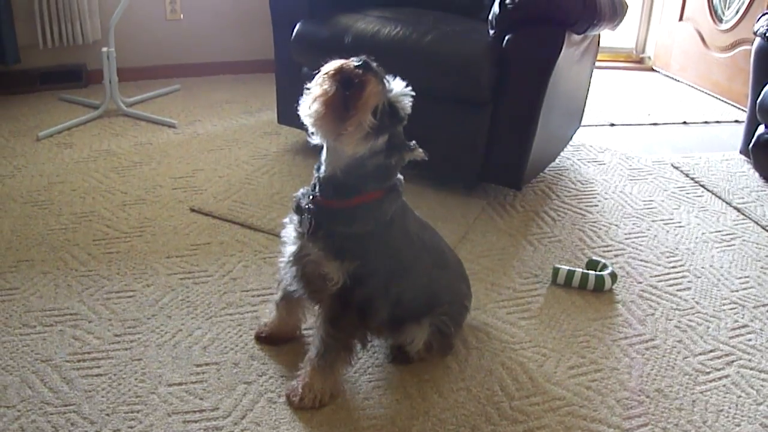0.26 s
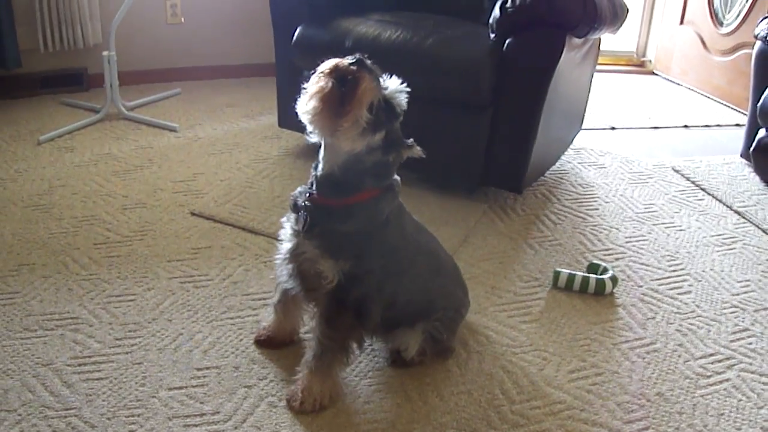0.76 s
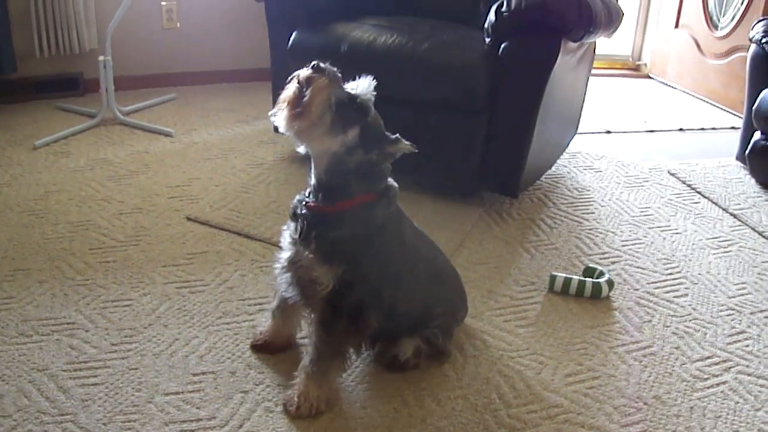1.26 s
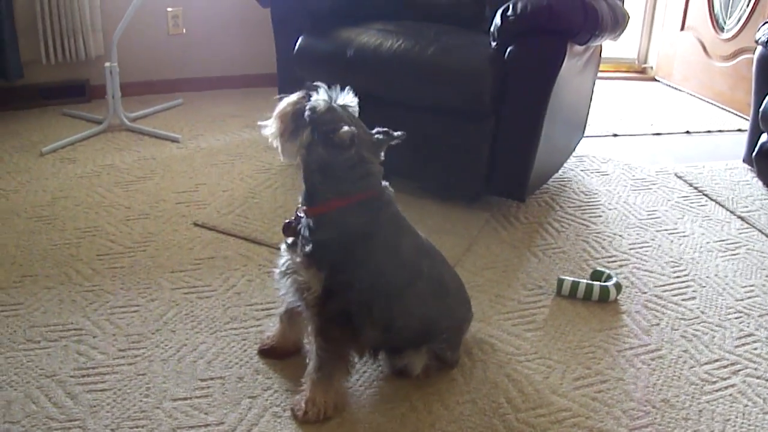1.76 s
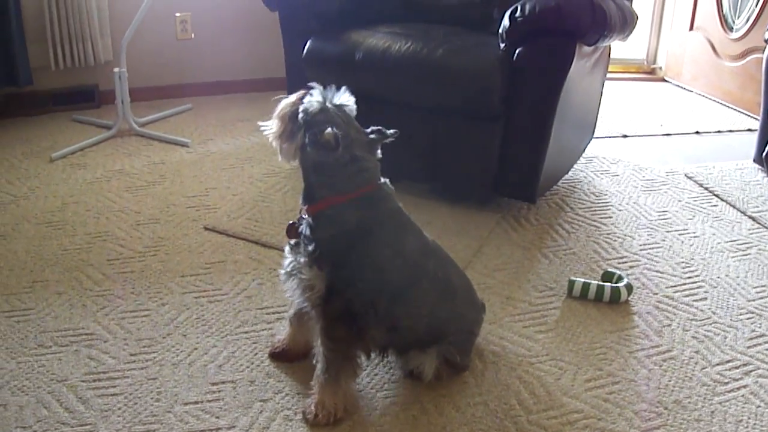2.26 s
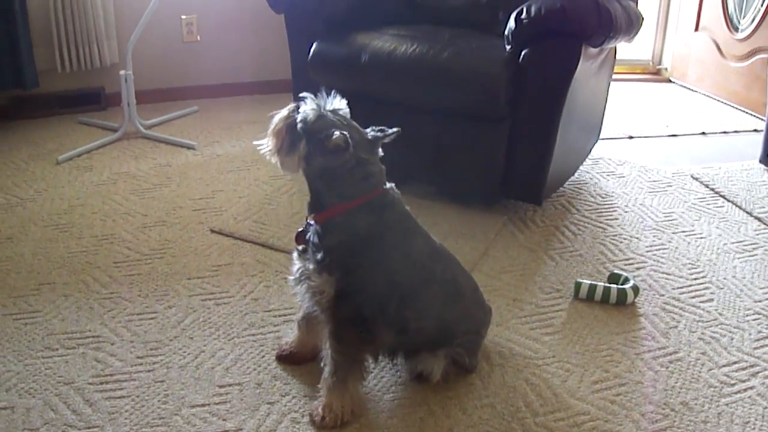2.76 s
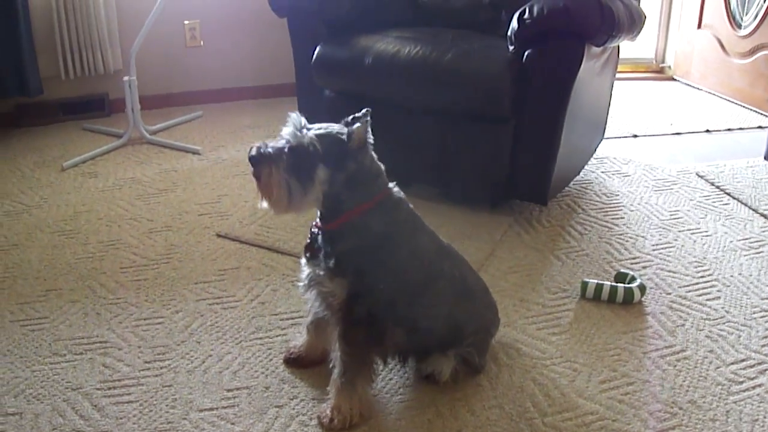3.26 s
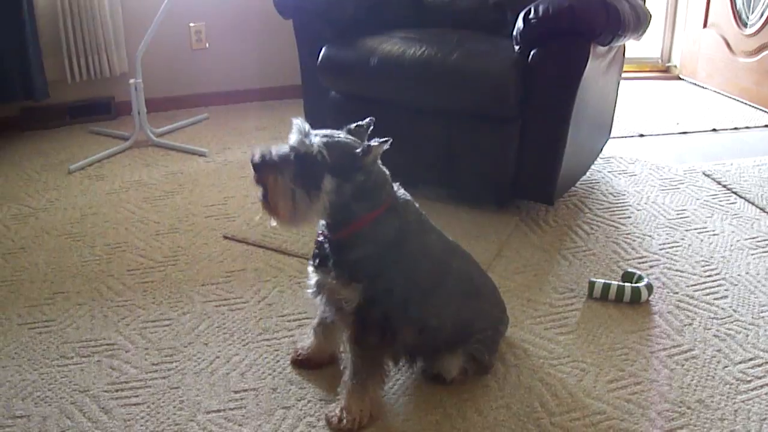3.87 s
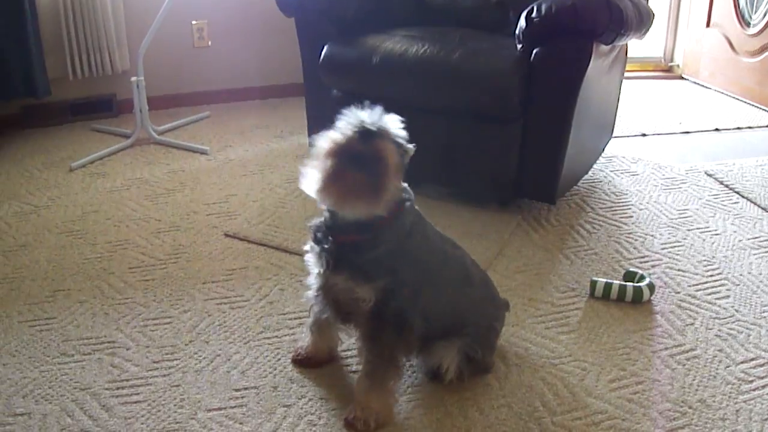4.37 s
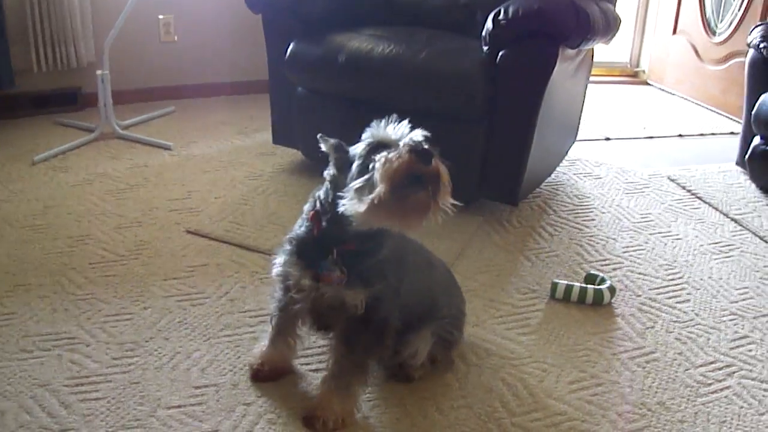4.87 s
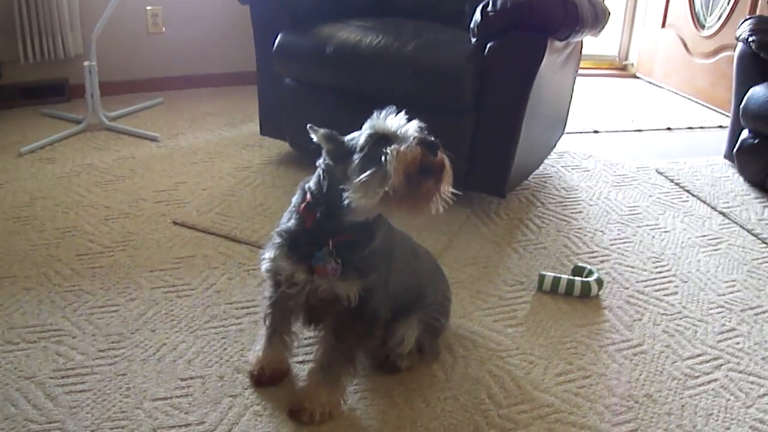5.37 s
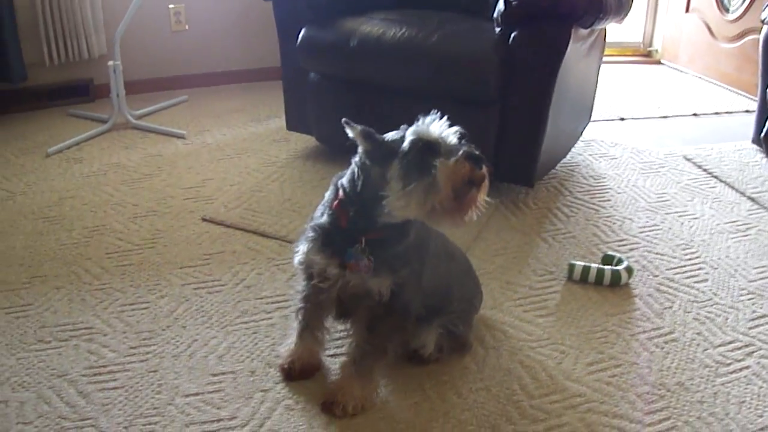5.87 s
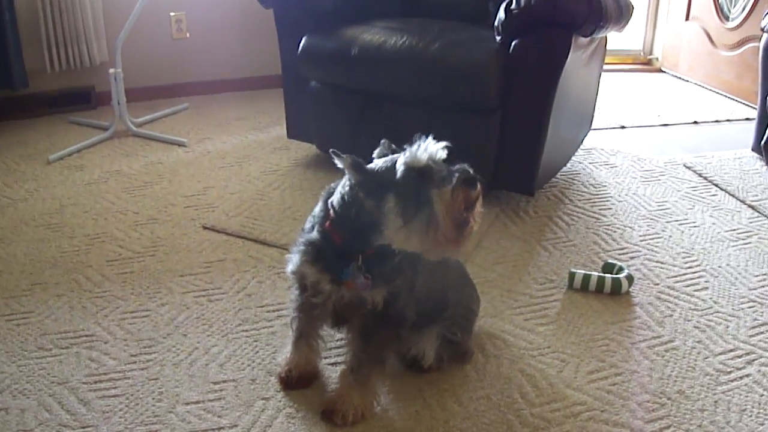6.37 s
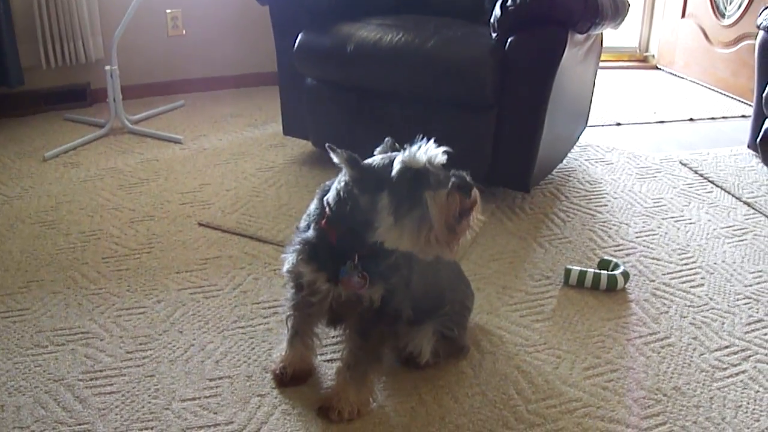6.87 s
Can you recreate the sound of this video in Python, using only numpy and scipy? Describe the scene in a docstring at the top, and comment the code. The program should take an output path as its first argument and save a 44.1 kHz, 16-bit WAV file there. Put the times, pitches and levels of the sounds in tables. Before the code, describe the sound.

A small dog howls in sliding notes and short hoarse yowls while a second dog whines thinly farther off in a quiet room.

```python
"""Two dogs howling and whining

A small dog on a living-room carpet howls: long sliding notes, and short yowls that turn hoarse when
its vocal folds swing unevenly. A second dog farther off whines in a thin voice that flips between a
low and a high register. A little shuffling, soft bumps and the furnished room's short ring surround them."""
import sys
import numpy as np
from scipy import signal
from scipy.fft import rfft, irfft, next_fast_len
from scipy.io import wavfile
from scipy.ndimage import uniform_filter1d, minimum_filter1d

SR = 44100
rng = np.random.default_rng(int(sys.argv[2]) if len(sys.argv) > 2 else 0)


def generate_wav(sig):
    """Save sig (samples, or channels by samples) to the path in sys.argv[1] as 16-bit PCM at SR."""
    pcm = np.round(np.clip(np.atleast_2d(sig).T, -1, 1) * 32767).astype(np.int16)
    wavfile.write(sys.argv[1], SR, pcm)


N = 313992
BREAK_HZ = 1297   # where the whine's low register ends
CUTOFF_HZ = 11050   # the treble stops here


def howls():
    """Three long sliding notes, pressed harder and so brighter when they leave the dog's easy pitch."""
    # the course of each howl: time_s, pitch_hz, fundamental_db, octave_db
    first_howl = [(0.0, 562.5, -10.5, -8), (0.072, 557.6, -16, -25), (0.14, 502, -28.5, -17.5),
                  (0.2, 485.8, -22.5, -34.5), (0.264, 497.8, -26.5, -18.5), (0.35, 566, -15.5, -13.5),
                  (0.492, 580.9, -21, -12.5), (0.512, 578.0, -20, -23.5), (0.62, 557, -17.5, -17.5),
                  (0.716, 597, -17, -11), (0.992, 585.9, -20.5, -18), (1.018, 548, -15, -36),
                  (1.042, 530, -30.5, -28), (1.06, 510, -38, -45)]
    long_howl = [(4.05, 582, -19.5, -12), (4.15, 671.5, -15, -14), (4.362, 641.4, -14.5, -21.5),
                 (4.412, 652.8, -17.5, -11), (4.72, 621, -13.5, -27), (4.756, 623.8, -19, -13),
                 (4.854, 613.2, -17, -24), (4.94, 602.5, -12.5, -14), (4.978, 599.5, -11, -28.5),
                 (5.176, 589.2, -14, -20), (5.354, 597.2, -11, -21), (5.418, 586.3, -18.5, -32),
                 (5.562, 576.3, -27, -24.5), (5.602, 550.2, -16, -18.5), (5.7, 465.3, -46.5, -24.5)]
    last_howl = [(6.67, 533.4, -33.5, -31), (6.714, 547, -17.5, -15), (6.764, 624, -15, -27.5),
                 (6.826, 625.8, -14, -19), (6.952, 585.4, -16, -31), (7.09, 565.3, -29.5, -23),
                 (7.12, 575, -15.5, -18)]
    # overtones from pressing the voice: pitch_hz, pressed_db
    strain = [(430, -47.5), (500, -59), (560, -55), (595, -62.5), (630, -59), (665, -50.5)]
    out = np.zeros(N)
    for course in (first_howl, long_howl, last_howl):
        at, gate = span(course[0][0], course[-1][0])
        pitch, fundamental_db, octave_db = in_time(course, at / SR)
        out += voice(at, gate, pitch, fundamental_db, octave_db, at_hz(strain, pitch), hoarseness(at))
    return out


def yowls(attack_s=.02, release_s=.011, sag_db_per_s=15.5):
    """Each yowl is one push: the pitch swoops up through the throat's resonance, then mostly sinks."""
    # arches of pitch: start_s, rise_s, fall_s, start_hz, top_hz, end_hz,
    # fall_shape (under 1 drops early), level_db, pressed_db, fade_db (over the fall)
    arches = [ (1.36, 0.034, 0.13, 770, 797, 715, 1.7, -27.5, -54.5, -1),
              (1.528, 0.087, .235, 542.2, 719.4, 548.4, 1.1, -11.5, -51, 11.5),
              (1.834, 0.11, 0.25, 535, 744, 514.8, 0.9, -14, -45, 2),
              (2.194, 0.074, 0.24, 532.4, 654.4, 430, 1.2, -10.5, -56.5, 11),
              (2.512, 0.14, 0.01, 300.1, 345, 347, 1.0, -26.5, -53.5, -3.5),
              (2.636, 0.037, .275, 429, 625.7, 480.4, .72, -14.5, -37.5, 6.5),
              (2.945, .08, .31, 487, 718, 324, 0.79, -14, -36.5, 22.5),
              (3.895, 0.12, .055, 473.7, 612, 568, 0.74, -15.5, -41.5, 2),
              (6.133, 0.069, .17, 561.4, 738.7, 503, 1.1, -13.5, -52, 6.5),
              (6.36, .115, 0.21, 486.2, 793.7, 532.7, 0.89, -14, -42, 14), ]
    # how the throat shapes the two lowest harmonics: frequency_hz, gain_db
    throat = [(320, -13), (430, -16), (510, -14.5), (570, -13), (640, -2.5), (740, 0.5), (880, -10),
              (1050, -8.5), (1270, -6.5), (1500, -12.5)]
    out = np.zeros(N)
    for start_s, rise_s, fall_s, start_hz, top_hz, end_hz, shape, level_db, pressed_db, fade_db in arches:
        at, gate = span(start_s, start_s + rise_s + fall_s + release_s)
        age = (at - at[0]) / SR
        past_top = np.maximum(age - rise_s, 0)
        risen = np.sin(np.pi / 2 * np.minimum(age / rise_s, 1)) ** 1.1
        fallen = np.sin(np.pi / 2 * np.minimum(past_top / fall_s, 1) ** shape) ** 2
        pitch = start_hz + (top_hz - start_hz) * risen + (end_hz - top_hz) * fallen
        envelope = np.minimum(age / attack_s, 1) * np.minimum((age[-1] - age) / release_s, 1)
        slack_db = fade_db * (past_top / fall_s) ** 1.15
        hoarse = hoarseness(at)
        # at the foot of the rise the push is harder and the voice not yet pressed
        push_db = level_db - slack_db + 5 * (1 - risen)
        press_db = pressed_db - slack_db - 3 * (1 - risen) - sag_db_per_s * past_top + 7 * hoarse
        fundamental_db = push_db + at_hz(throat, pitch)
        octave_db = push_db + at_hz(throat, 2 * pitch)
        rough = hoarse + .12 * fallen
        out += voice(at, gate * envelope, pitch, fundamental_db, octave_db, press_db, rough)
    return out


def voice(at, gate, pitch, fundamental_db, octave_db, pressed_db, rough,
          waver=.025, jitter=.029, blur_hz=1400, easy_db=-57, rasp_db=22.5):
    """Vocal folds swing almost as a pure tone; when hoarse, each cycle differs in length and strength."""
    # how the open mouth shapes pressed overtones and rasp: frequency_hz, gain_db
    mouth = [(500, -2.5), (900, -7.5), (1300, 21.5), (1700, 7.5), (2050, 10), (2350, -4.5), (3050, 2),
             (3450, -6), (3850, -25.5), (4900, -16.5), (6000, -27.5), (7800, -17.5), (11000, -35)]
    # a thin, bright edge on the voice: frequency_hz, gain_db
    edge_colour = [(2000, -74.5), (3500, -72), (4400, -55), (5200, -59), (6100, -73), (7000, -61),
                   (7600, -61), (8200, -67), (8900, -54.5), (9500, -66), (10100, -61.5), (11000, -63.5)]
    size = len(at)
    phase = phase_of(pitch * (1 + rough * (waver * wobble(32, size) + jitter * wobble(200, size))))
    fundamental, octave, pressed = from_db(fundamental_db), from_db(octave_db), from_db(pressed_db)
    # pressing adds at most 1 dB to the edge
    edge = np.hypot(fundamental, octave) * from_db(np.minimum(.86 * (pressed_db - easy_db), 1))
    overtones = octave * partial(phase, 2)
    for k in range(3, 20):
        hz = k * pitch
        # ragged closing of the folds loses the highest harmonics; each comes and goes on its own
        clear = from_db(6.5 * wobble(10.2, size)) / (1 + (rough * hz / blur_hz) ** 2)
        strength = pressed * from_db(at_hz(mouth, hz)) + edge * from_db(at_hz(edge_colour, hz))
        overtones += clear * strength * partial(phase, k)
    # uneven cycles shake the overtones far more than the fundamental
    tone = fundamental * partial(phase, .99) * (1 + .13 * rough * wobble(140, size))
    # in fits, strong and weak cycles alternate
    alternate = .56 * wobble(25, size) * np.sin(phase / 2)
    tone += overtones * (1 + rough * (.95 * wobble(290, size) + alternate))
    # air rasps through the folds once a cycle
    rasp = coloured_noise(mouth, size) * (1 + np.sin(phase) / 2)
    rasp = cut_bass(rasp, 600, order=4)
    out = np.zeros(N)
    out[at] = gate * (tone + from_db(rasp_db) * pressed * rough ** 1.5 * rasp)
    # the small throat sends out little below its lowest note
    return cut_bass(out, 200)


def hoarseness(at, clear_roughness=.059):
    """How rough the howler's voice is, from 0 to 1, at the given samples."""
    # hoarse moments: middle_s, half_length_s, roughness
    moments = [(1.562, 0.052, 0.79), (1.954, 0.058, 0.72), (2.642, 0.028, 0.37), (3.1, .12, .25),
               (3.983, .035, 0.45), (6.165, .027, 0.99), (6.465, .045, 0.74)]
    extra = sum(rough * np.exp(-((at / SR - s) / half) ** 2 / 2) for s, half, rough in moments)
    return np.clip(clear_roughness + extra, 0, 1)


def moan(waver=.0027):
    """A soft low note between howls, sinking slowly."""
    # the note's course: time_s, pitch_hz, level_db
    course = [(5.86, 346, -73), (5.949, 323, -46), (6.022, 321.2, -38.5), (6.1, 316, -39.5),
              (6.15, 321, -66)]
    # its harmonics: multiple, gain_db
    harmonics = [(1, -23), (2, 1.5), (3, 1.5), (4, -8.5)]
    at, gate = span(course[0][0], course[-1][0])
    pitch, level_db = in_time(course, at / SR)
    phase = phase_of(pitch * (1 + waver * wobble(35, len(at))))
    tone = sum(from_db(db) * partial(phase, round(k)) for k, db in harmonics)
    out = np.zeros(N)
    out[at] = gate * from_db(level_db) * tone
    return out


def whines(attack_s=.0027, jitter=.012, flip_jitter=.08, steady_rasp=.21):
    """Whistle-like, unsteady tones that crack into rasp when the pitch leaps to the other register."""
    # the second dog's calls: start_s, climb_s, upper_s, tail_s, start_hz, top_hz, end_hz,
    # climb_db, upper_db, tail_db
    calls = [ (0, 0.052, 0.15, 0.055, 1188, 1759, 1240, -22, -30, -34),
             (0.474, .037, 0.049, 0.057, 1036, 1946, 1220, -20.5, -31, -24),
             (.8, 0.044, 0.25, .09, 920, 1860, 1220, -26, -35, -25.5),
             (1.139, 0.026, 0.063, .14, 1215, 1794, 1433, -25, -26.5, -24.5),
             (1.334, 0.015, 0.25, 0.0099, 1300, 1898, 1300, -36, -42.5, -62),
             (1.66, 0.022, 0.081, .05, 1285, 1900, 1300, -51, -38, -52),
             (2.374, 0.026, 0.076, 0.065, 1004, 1747, 1250, -28, -29.5, -23),
             (3.407, 0.044, .16, .125, 1030, 1716, 885, -22.5, -34, -29),
             (3.714, 0.094, 0.045, 0.073, 883, 1785, 1150, -23.5, -32, -20),
             (4.557, 0.032, 0.15, 0.38, 987, 1853, 1400, -32.5, -42, -45.5),
             (4.885, 0.027, .16, .06, 1230, 1892, 1350, -33, -39.5, -57),
             (5.328, 0.096, 0.19, 0.1, 1041, 1910, 900, -37.5, -44, -38.5),
             (5.708, .045, 0.056, 0.13, 971, 1875, 1260, -29.5, -37, -31.5),
             (6.116, 0.043, 0.048, 0.13, 1034, 1809, 1230, -25.5, -35.5, -35.5),
             (6.668, 0.04, .12, 0.35, 1298, 1848, 1290, -28.5, -39.5, -35.5), ]
    # how its mouth shapes upper harmonics and rasp: frequency_hz, gain_db
    mouth = [(700, -21), (1200, -12), (1900, 1), (2600, 2), (3400, 0), (4000, -5), (5000, -2.5),
             (5900, -31), (8000, -24), (11000, -33)]
    out = np.zeros(N)
    for start_s, climb_s, upper_s, tail_s, *pitches_and_levels in calls:
        at, gate = span(start_s, start_s + climb_s + upper_s + tail_s)
        age = (at - at[0]) / SR
        pitch, level_db, octave_db = whine_course(age, climb_s, upper_s, tail_s, *pitches_and_levels)
        glide_speed = uniform_filter1d(np.abs(np.gradient(np.log(pitch))) * SR, size=700)
        flip = np.clip(glide_speed / 19, 0, 1) ** 2
        # the upper register is the less steady one
        waver = (.008 + .02 * np.clip(pitch / BREAK_HZ - 1, 0, 1)) * wobble(70, len(at))
        shake = (jitter + flip_jitter * flip) * wobble(420, len(at))
        phase = phase_of(pitch * (1 + waver + shake))
        overtones = partial(phase, 2)
        for k in range(3, 7):
            overtones += from_db(at_hz(mouth, k * pitch) - 10) * partial(phase, k)
        tone = from_db(level_db) * partial(phase, .99) + from_db(octave_db) * overtones
        rasp = from_db(octave_db) * (flip + steady_rasp) * coloured_noise(mouth, len(at))
        out[at] += gate * np.minimum(age / attack_s, 1) * ((1 - flip / 2) * tone + rasp)
    return out


def whine_course(age, climb_s, upper_s, tail_s, start_hz, top_hz, end_hz, climb_db, upper_db, tail_db,
                 flip_s=.012, low_octave_db=-18.5, upper_octave_db=-8.5):
    """Pitch, level and octave level as a whine climbs, flips up, flips back and trails off."""
    up, down = climb_s, climb_s + upper_s
    pitch, level_db, octave_offset_db = in_time([
        (0, start_hz, climb_db, low_octave_db),
        (up, min(start_hz * 1.19, BREAK_HZ), climb_db, low_octave_db),
        (up + flip_s, top_hz * .97, upper_db, upper_octave_db),
        (up + flip_s + .25 * upper_s, top_hz, upper_db, upper_octave_db),
        (down, top_hz * .86, upper_db - 12, upper_octave_db),
        (down + flip_s, BREAK_HZ, tail_db, low_octave_db),
        (down + tail_s, end_hz, tail_db - 11.5, low_octave_db)], age)
    return pitch, level_db, level_db + octave_offset_db


def yap():
    """A gruff puff of noise through the throat, under the longest howl."""
    # the puff: start_s, length_s, level_db
    puffs = [(4.297, 0.026, -8.5)]
    # throat resonances: centre_hz, width_hz, gain_db
    throat = [(590, 240, -23.5), (915, 310, -14), (1285, 130, -8)]
    return bursts(puffs, throat, attack_s=.00094)


def bumps():
    """Soft knocks stir the floor's low resonances."""
    # the knocks: start_s, length_s, level_db
    knocks = [(.305, 0.021, -31.5), (.875, 0.029, -37), (4.98, 0.029, -40)]
    # floor resonances: centre_hz, width_hz, gain_db
    floor = [(137, 17, 5), (247, 32, 2), (355, 130, 1.8)]
    return bursts(knocks, floor, attack_s=.003)


def ticks():
    """Small dry ticks: very short bursts of bright noise."""
    # the ticks: start_s, length_s, level_db
    events = [(1.571, .002, -21), (4.108, .002, -40), (4.268, .002, -44)]
    # their resonances: centre_hz, width_hz, gain_db
    resonances = [(1540, 590, 0), (3420, 2200, -10), (7500, 3300, -24)]
    return bursts(events, resonances, attack_s=.0002)


def shuffling():
    """A soft rustle of noise that swells briefly."""
    # its loudness: time_s, level_db
    loudness = [(0, -87.5), (1.06, -50.5), (1.14, -30.5), (1.25, -31), (1.32, -37), (1.42, -27), (1.5, -45),
                (1.6, -71.5), (7.12, -84.5)]
    # its tone colour: frequency_hz, gain_db
    colour = [(60, -16), (130, -2.5), (300, 8.5), (700, 16), (1500, 6.5), (3000, -21.5), (5000, -7.5),
              (6200, -23.5), (8000, -13), (11000, -27.5)]
    level_db, = in_time(loudness, np.arange(N) / SR)
    return from_db(level_db) * coloured_noise(colour, N)


def room_ring(x, count=12):
    """Sound circles between the walls on unrelated paths, each frequency dying at its own rate."""
    # time the ring takes to fall 60 dB: frequency_hz, ring_s
    ring_times = [(200, 0.099), (700, 0.4), (1600, 0.46), (4000, 0.42), (10000, 0.14)]
    # the raised muzzle beams overtones at the ceiling, so they return as ring: frequency_hz, gain_db
    beam = [(300, -13), (600, 3.5), (1100, 1.5), (1700, 8), (3500, 0), (5000, 1), (8000, 4)]
    size = next_fast_len(N + SR)
    hz = np.fft.rfftfreq(size, 1 / SR)
    ring_s, response = at_hz(ring_times, hz), 0
    paths_s = np.geomspace(.0173, .0471, count)
    arrivals_s = np.roll(np.geomspace(.0041, .033, count), 5)
    for k, (path_s, first_s) in enumerate(zip(paths_s, arrivals_s)):
        round_trip = from_db(-60 * path_s / ring_s) * np.exp(-2j * np.pi * hz * path_s)
        response += (-1) ** k * np.exp(-2j * np.pi * hz * first_s) / (1 - round_trip)
    response /= np.sqrt(np.mean(np.abs(response[hz < CUTOFF_HZ / 2]) ** 2))
    return irfft(rfft(x, size) * response * from_db(at_hz(beam, hz)), size)[:N]


def room_hush(level_db=-56):
    """The faint, steady noise of a still room."""
    # its tone colour: frequency_hz, gain_db
    colour = [(30, -24), (70, -11), (130, 0), (200, -3), (500, 0.5), (1300, -10.5), (3000, -1.5),
              (5000, -3.5), (6200, -12), (11000, -15.5)]
    return from_db(level_db) * coloured_noise(colour, N)


def bursts(events, resonances, attack_s):
    """Short pushes of noise into a few broad resonances."""
    t, white = np.arange(N) / SR, rng.standard_normal(N)
    tone = push = 0
    for hz, width, db in resonances:
        band = signal.butter(3, [hz - width / 2, hz + width / 2], "band", fs=SR, output="sos")
        tone += from_db(db) * signal.sosfilt(band, white)
    for start_s, length_s, db in events:
        age = np.maximum(t - start_s, 0)
        push += from_db(db) * (1 - np.exp(-age / attack_s)) * np.exp(-(age / length_s) ** 2 / 2)
    return push * rms_one(tone)


def from_db(db):
    """Turn decibels into a gain."""
    return 10 ** (np.asarray(db) / 20)


def rms_one(x):
    """Scale to an average strength (rms) of 1."""
    return x / np.sqrt(np.mean(x ** 2) + 1e-20)


def in_time(rows, t):
    """Read each column of a table at the times t."""
    times, *columns = np.transpose(rows)
    return [np.interp(t, times, column) for column in columns]


def at_hz(points, hz):
    """Read a table on a log-frequency axis."""
    known, value = np.transpose(points)
    return np.interp(np.log(np.maximum(hz, 1)), np.log(known), value)


def span(start_s, end_s, fade_s=.006):
    """The sample numbers a call covers, and a gate that fades it in and out."""
    at = np.arange(max(int(start_s * SR), 0), min(int(end_s * SR), N))
    return at, np.clip(np.minimum(at - at[0], at[-1] - at) / (fade_s * SR), 0, 1)


def wobble(rate_hz, size):
    """A smooth random wiggle up to about rate_hz, rms 1."""
    low = signal.butter(2, rate_hz, fs=SR, output="sos")
    return rms_one(signal.sosfilt(low, rng.standard_normal(size + SR // 2))[SR // 2:])


def coloured_noise(spectrum, size):
    """Noise with the given tone colour, rms 1."""
    length = next_fast_len(size)
    gain = from_db(at_hz(spectrum, np.fft.rfftfreq(length, 1 / SR)))
    return rms_one(irfft(rfft(rng.standard_normal(length)) * gain, length)[:size])


def cut_bass(x, hz, order=2):
    """Weaken everything below hz."""
    return signal.sosfilt(signal.butter(order, hz, "high", fs=SR, output="sos"), x)


def phase_of(pitch):
    """How far a vibration has turned, in radians."""
    return 2 * np.pi * np.cumsum(pitch) / SR


def partial(phase, multiple):
    """A pure tone at a multiple of the pitch, rms 1."""
    return np.sqrt(2) * np.sin(multiple * phase)


def scene(howl_db=-.5, yowl_db=.5, whine_db=5, near_room_db=-8, far_room_db=-6):
    """The howler is close by; the whiner is farther off, so more of the room's ring comes with it."""
    near = from_db(howl_db) * howls() + from_db(yowl_db) * yowls() + moan()
    far = from_db(whine_db) * whines()
    near += yap() + bumps()
    ring = room_ring(from_db(near_room_db) * near + from_db(far_room_db) * far)
    return (near + far + ring + ticks() + shuffling() + room_hush())[None]


def record(dry, low_cut_hz=45, ceiling=.66, release_db_per_s=40):
    """The microphone sheds deep bass, a limiter holds loud notes down, and the top is cut steeply."""
    x = cut_bass(dry[0], low_cut_hz)
    over_db = 20 * np.log10(np.maximum(np.abs(x) / ceiling, 1))
    release_db = release_db_per_s * np.arange(N) / SR
    held_db = np.maximum.accumulate(over_db + release_db) - release_db
    smooth_gain_db = uniform_filter1d(minimum_filter1d(-held_db, size=131), size=131)
    treble_cut = signal.ellip(12, .1, 80, CUTOFF_HZ, fs=SR, output="sos")
    return signal.sosfilt(treble_cut, x * from_db(smooth_gain_db))[None]


dry = scene()
out = record(dry)
generate_wav(out)
```